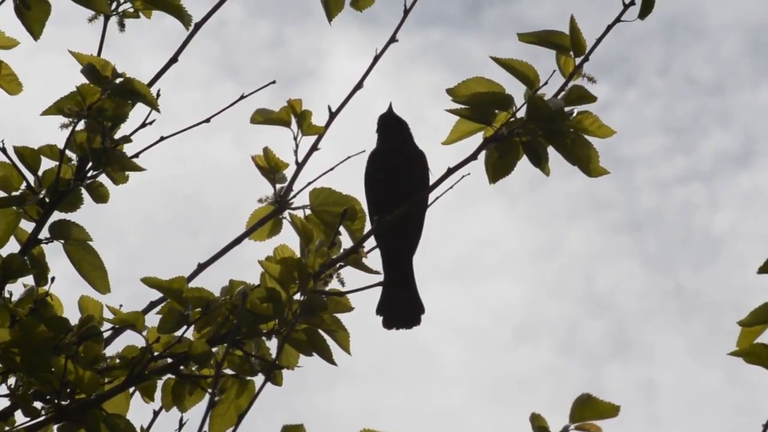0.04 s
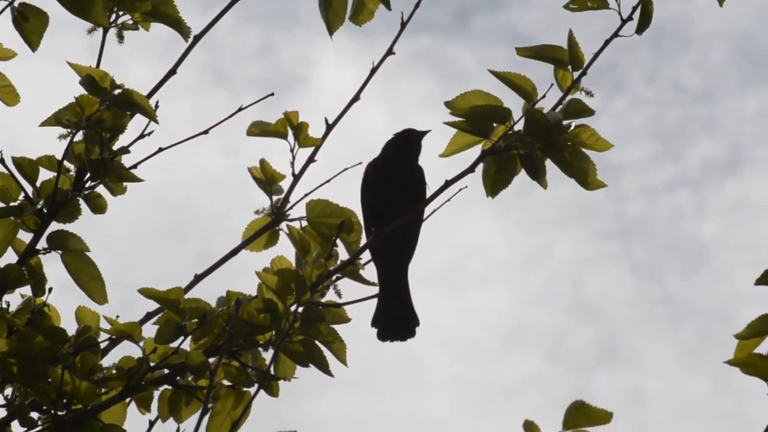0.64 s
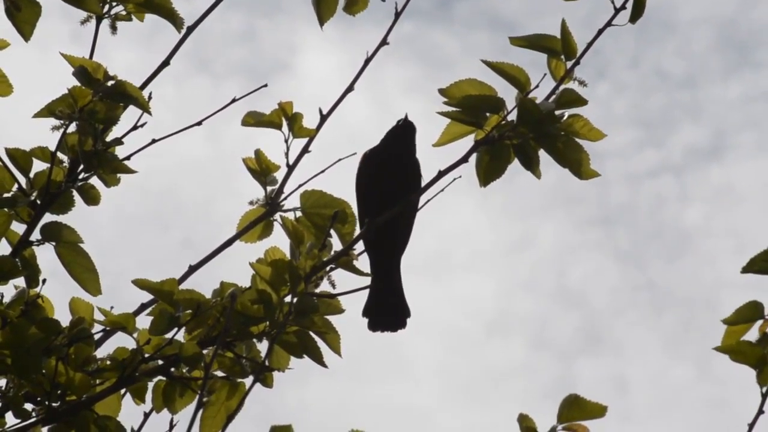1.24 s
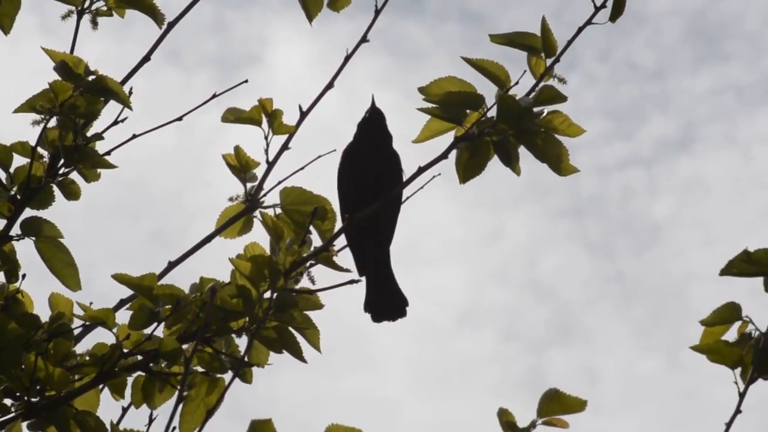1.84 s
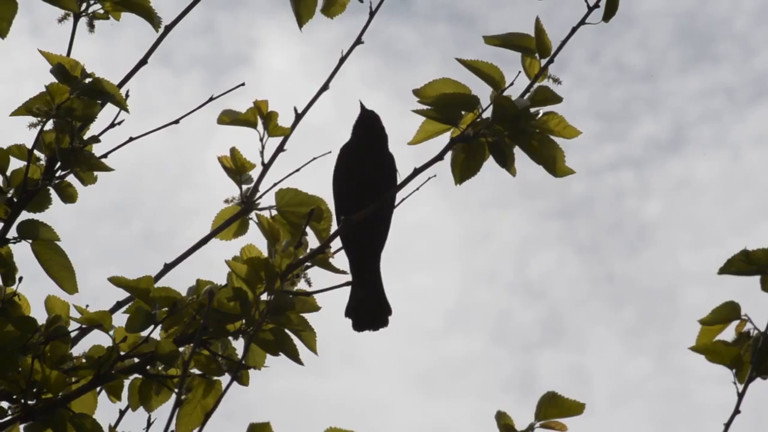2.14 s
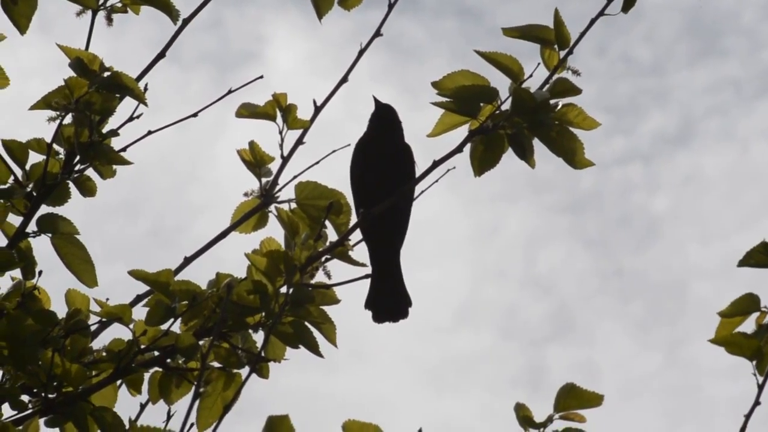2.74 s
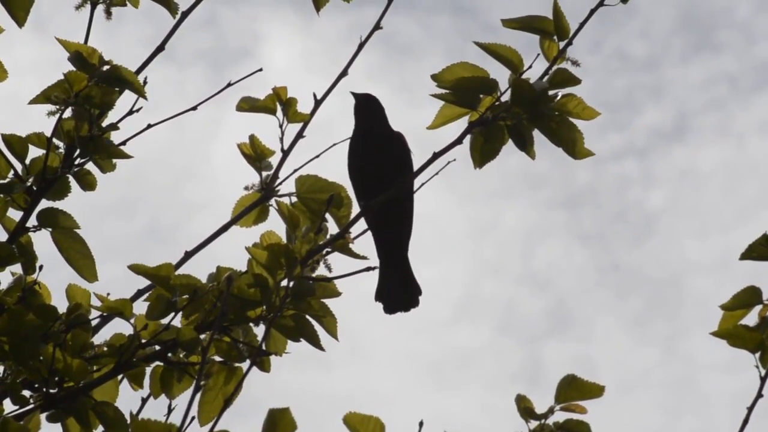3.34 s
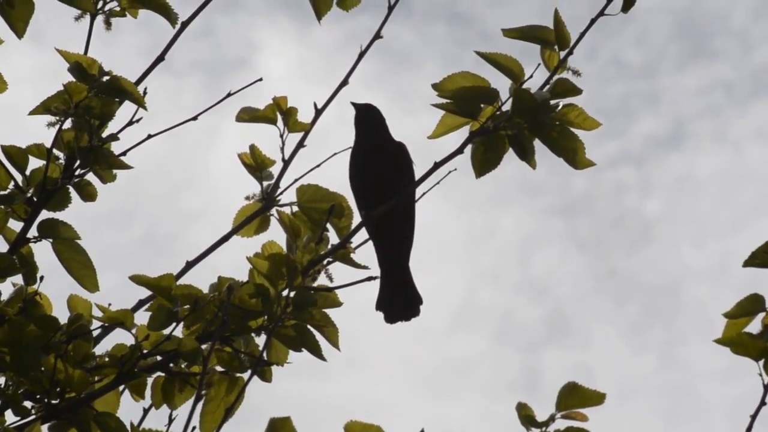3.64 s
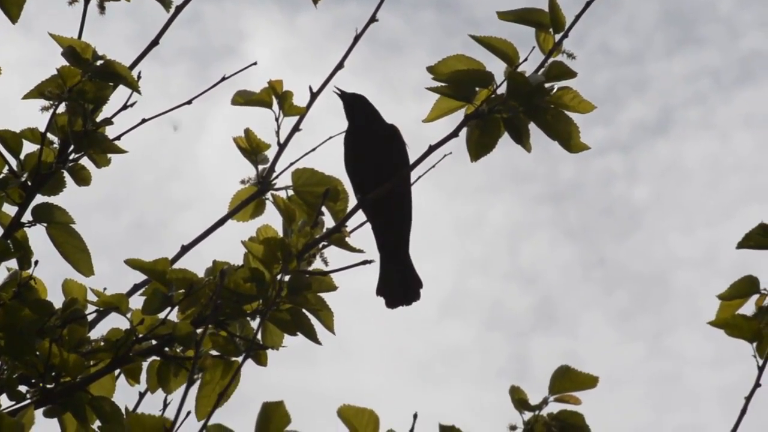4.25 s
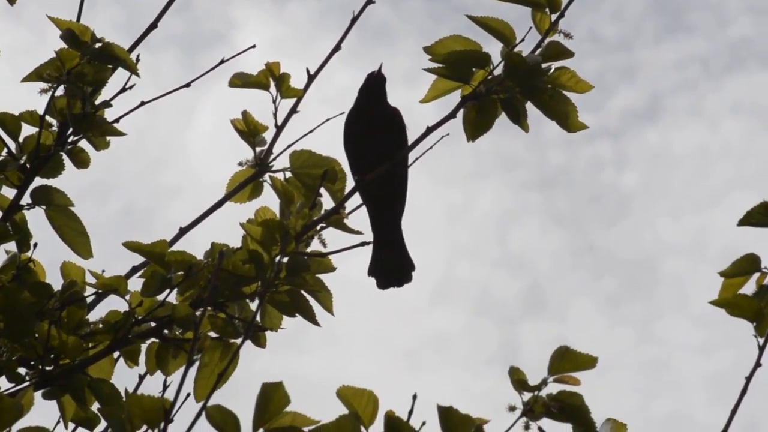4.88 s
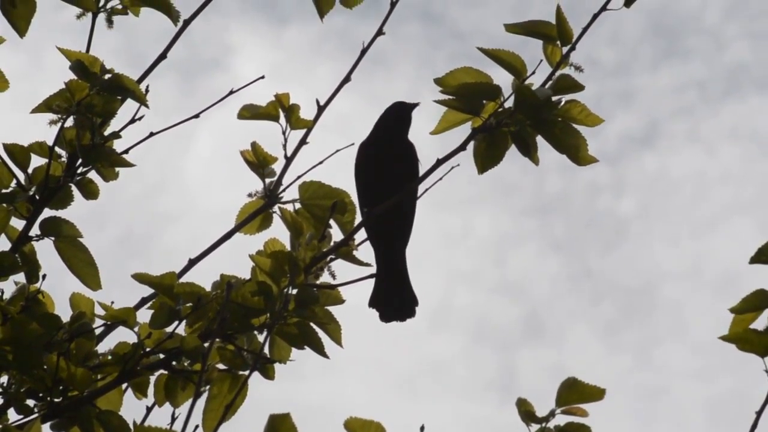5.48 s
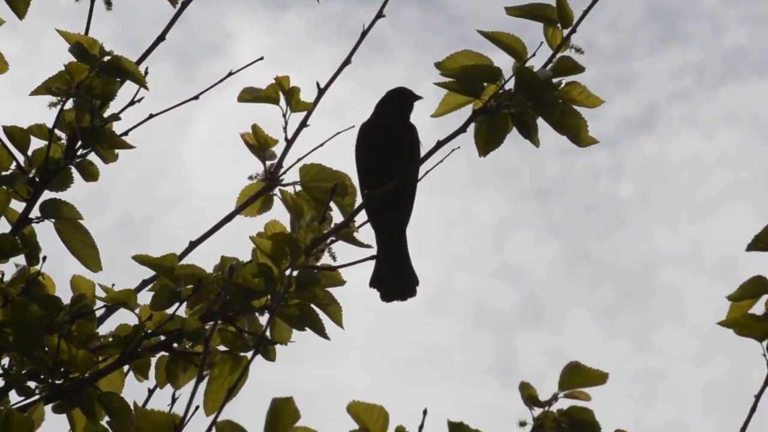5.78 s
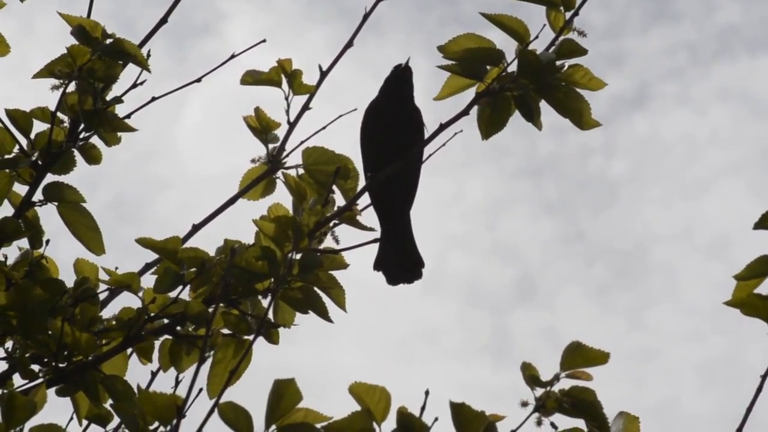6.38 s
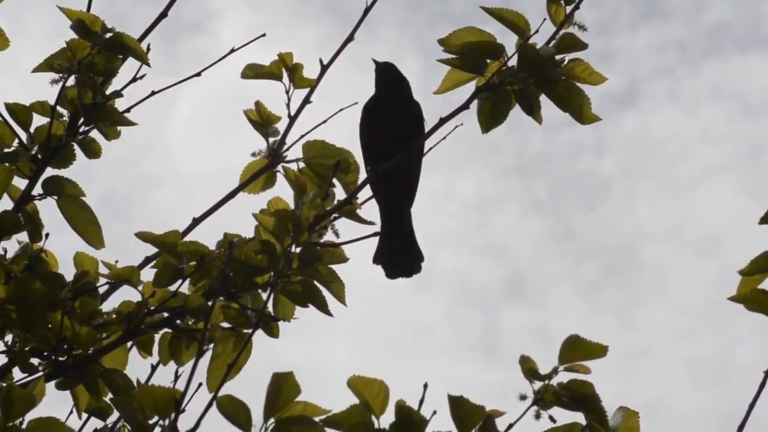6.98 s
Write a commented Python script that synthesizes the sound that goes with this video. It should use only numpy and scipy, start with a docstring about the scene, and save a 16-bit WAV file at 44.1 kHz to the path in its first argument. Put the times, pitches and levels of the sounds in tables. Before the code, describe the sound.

Three piercing, down-sliding bird whistles sound outdoors with long gaps and a few dry chacks, above a soft traffic rumble.

```python
"""A loud falling whistle from a blackbird on a branch opens the scene and comes twice more.
Each whistle breaks from the shrill side of its syrinx to the pure side, which slides down.
Far traffic rumbles and hums underneath, other birds chirp faintly and something rustles softly.
Two dry chacks and a lower chuck, puffs and pulses that ring the throat, come before the last whistle.
The recorder's gain control pulls the background down under each whistle."""
import sys
import numpy as np
from scipy import signal
from scipy.fft import rfft, irfft, next_fast_len
from scipy.io import wavfile
from scipy.ndimage import uniform_filter1d, minimum_filter1d

SR = 44100
rng = np.random.default_rng(int(sys.argv[2]) if len(sys.argv) > 2 else 0)


def int16_out(signal):
    """Quantize to a 16-bit WAV file."""
    q = np.round(np.clip(np.atleast_2d(signal).T, -1, 1) * 32767)
    wavfile.write(sys.argv[1], SR, q.astype(np.int16))


N = 313992
TIME = np.arange(N) / SR
PRE_ROLL = SR // 4  # samples before time zero, where the first whistle begins

# Levels are faders ahead of the gain control. A positive pan leans left.
# the blackbird's whistles: (time of the break [s], shrill lead [s], shrill top [Hz], shrill level [dB],
# slide length [s], glide [s], slide end [Hz], closing flick [Hz], slide level [dB], overtones [dB])
WHISTLE_CUES = [(-.072, .1, 3750, -7, .15, 0.068, 3710, -50, -2, 6.5),
                (2.102, .1105, 3785, -10.5, .19, 0.052, 3844, 40, 1, 1.5),
                (6.319, .095, 3860, -10, .17, 0.061, 3775, 167, -1.5, 0.5)]
# harmonics 1 to 4 of each side of the syrinx: (level [dB])
SHRILL_TIMBRE = [-16.5, 1.5, -22, -22]
SLIDE_TIMBRE = [0, -22, -24.5, -39]
# the beak radiates the middle of the range best: (frequency [Hz], gain [dB])
BEAK_EQ = [(2000, -2.5), (7800, 0.5), (9000, -3), (10400, -3), (11500, -13.5), (15000, -8)]
# the highest overtones lean right: (frequency [Hz], pan [dB])
WHISTLE_PAN = [(7500, 2), (10000, 0), (15000, -5)]
# the shrill side joins in again below the slide: (time [s], half length [s], level [dB])
UNDERTONE_CUES = [(.005, 0.029, -21), (2.257, .019, -27)]
# bright, rasping hiss on the loud, high start of the slide: (frequency [Hz], level [dB])
SLIDE_HISS_EQ = [(2000, -19), (3600, 1), (5000, 5), (6200, 0), (9500, 11), (11500, -3), (15000, -10)]
# hoarse hiss on the undertone: (frequency [Hz], level [dB])
UNDERTONE_HISS_EQ = [(2000, -16), (5000, -4), (9000, 12), (15000, -23)]
# decay of the yard's tail: (frequency [Hz], t60 [s])
YARD_DECAY = [(2000, 0.47), (4000, 0.68), (7500, 0.59), (14000, 0.36)]

# colour of the road and of the air: (frequency [Hz], level [dB])
ROAD_EQ = [(15, -26), (35, -33.5), (70, -18), (125, -10.5), (190, -4.5), (228, -2), (290, -9), (430, -7),
           (570, 0.5), (830, -1), (1030, 1), (1300, -5.5), (1650, -7), (2600, -51)]
AIR_EQ = [(880, -54), (1500, -9.5), (1840, -3), (2100, -5), (3360, -9), (4100, -13.5), (5240, -16),
          (5840, -18), (15000, -33.5), (15800, -48)]
# stereo image of both: (frequency [Hz], left-right likeness [-1 to 1])
BED_LIKENESS = [(60, 0.96), (130, 0.99), (290, 0.97), (640, 0.92), (1410, 0.57), (3100, -0.55),
                (6820, -0.047), (15000, 0.16)]
# fader rides of the road and of the engine's hum: (time [s], level [dB])
ROAD_FADER = [(0, -29.5), (.9, -30), (1.65, -28.5), (2.6, -30.5), (4.2, -30.5), (4.9, -28.5), (5.6, -29.5),
              (7.1, -29)]
HUM_FADER = [(0, -40), (2, -44), (2.6, -51.5), (3.1, -42.5), (3.7, -51.5), (7.1, -51)]
# far whines in the traffic: (start [s], end [s], pitch [Hz], level [dB])
WHINE_CUES = [(.4, 2.47, 573, -42.5), (3.3, 7.5, 501.7, -44.5)]

# one bird's repeated chip on the left, another's thin ticks on the right: (time [s], level [dB])
CHIP_CUES = [(.237, -37), (.578, -48), (1.265, -37), (3.903, -37.5), (4.377, -47), (4.801, -37),
             (5.584, -35.5)]
TICK_CUES = [(1.177, -37.5), (1.193, -40.5), (2.815, -39.5)]
# a third bird's rising twitter: (time [s], length [s], lower pitch [Hz], level [dB])
TWITTER_CUES = [(5.068, .042, 2890, -35), (5.096, 0.037, 2500, -35.5), (5.137, 0.088, 2645, -34.5)]
# hoarseness of all three: (frequency [Hz], level [dB])
CHIRP_HISS_EQ = [(2000, -6), (3200, 6.5), (4800, -6), (5700, -4), (6600, -4), (7400, -6), (12000, -42)]

# soft rustles: (time [s], width [s], level [dB])
RUSTLE_CUES = [(2.855, 0.036, -38.5), (2.97, 0.042, -43.5), (3.085, 0.025, -46), (3.293, 0.065, -33.5),
               (3.482, 0.037, -34.5), (3.989, 0.046, -34), (4.13, 0.032, -29.5), (6.935, 0.21, -48.5)]
# their colour: (frequency [Hz], level [dB])
RUSTLE_EQ = [(1060, -49), (1800, 3), (1950, -9.5), (3200, -0.5), (3470, -2.5), (3960, -2.5), (4570, 1),
             (5410, -8), (6570, -5), (10600, -13), (15000, -45)]

# dry chacks: (time of the peak [s], rise [s], fall [s], level [dB], pan [dB])
CHACK_CUES = [(3.989, 0.0094, 0.02, -10, 3.5), (4.254, 0.011, .014, -8, 2.5)]
# the throat's resonance in a chack: (frequency [Hz], level [dB])
THROAT_EQ = [(880, -50), (1500, -17.5), (1670, -27), (2350, -15), (2540, -11), (2780, -13.5), (3250, -6),
             (3690, 2.5), (3910, -1.5), (5240, -12), (5670, -20), (7900, -15), (10900, -30.5), (13700, -32),
             (15500, -45)]
# the chuck's two quick pulses: (time [s], level [dB])
CHUCK_PULSES = [(5.682, -11), (5.6897, -11)]
# the throat that rings with them: (frequency [Hz], level [dB], t60 [s])
THROAT_MODES = [(2830, -1.5, 0.035), (3130, -5, 0.019), (2420, -3.5, 0.019), (4460, -19, 0.017),
                (6640, -20, 0.038), (9300, -23, 0.02)]

# the shrill side: pitch, level and flutter
LEAP_SHARE, LEAP_S, BREAK_HZ = 0.52, 0.00246, 3198
REBOUND_HZ, REBOUND_S, OVERLAP_S = 452, 0.019, .06
SHRILL_SWELL_DB, SHRILL_DROP_DB, HANDOVER_S = 6, 9, 0.009
FLUTTER_CALM, FLUTTER_FORCED = 0.2, 0.71  # depth 0-1, deepest just before the break
# the pure side: pitch, brightness and level
SLIDE_TOP_HZ, SAG_HZ_PER_S, FLICK_S = 5715, 720, 0.0069
FORCED_FROM_HZ, FORCED_PURITY_DB = 5070, 13
SOFT_START_DB, SOFT_START_S, HOLD_S = 13, .017, .142
ACCENT_DB, ACCENT_AT_S, ACCENT_WIDTH_S = 7, 0.026, 0.012


def gain_of(db):
    """Decibels to amplitude."""
    return 10 ** (np.asarray(db) / 20)


def unit_rms(x):
    """Scales to rms 1."""
    return x / np.sqrt(np.mean(x ** 2) + 1e-20)


def ramp(x):
    """Holds a value between 0 and 1."""
    return np.clip(x, 0, 1)


def at_hz(points, hz):
    """Reads a curve on a log-frequency axis."""
    f, value = np.transpose(points)
    return np.interp(np.log(hz + 1), np.log(f + 1), value)


def ride(fader):
    """A fader's level in dB at every sample."""
    return np.interp(TIME, *np.transpose(fader))


def add(mix, s, sound):
    """Mixes a stereo sound in at time s."""
    part = mix[:, max(round(s * SR), 0):][:, :sound.shape[1]]
    part += sound[:, :part.shape[1]]


def panned(x, pan_db):
    """Sets a sound between left and right."""
    return x * gain_of(np.array([[1], [-1]]) * pan_db / 2)


def eased(x):
    """Fades a note in and out over a few milliseconds."""
    return x * signal.windows.tukey(x.shape[-1], .005 * SR / x.shape[-1])


def wander(size, rate_hz):
    """Smooth random modulation of rms 1, up to about the given rate."""
    length = next_fast_len(size + SR // 4)
    hz = np.fft.rfftfreq(length, 1 / SR)
    spectrum = rfft(rng.standard_normal(length)) * np.exp(-(hz / rate_hz) ** 2)
    return unit_rms(irfft(spectrum, length))[:size]


def phase_of(hz):
    """Running phase of a pitch curve."""
    return 2 * np.pi * np.cumsum(hz) / SR


def noise(colour, size, likeness):
    """Stereo noise of a given colour and left-right likeness."""
    hz = np.fft.rfftfreq(size, 1 / SR)
    mid, side = rfft(rng.standard_normal((2, size))) * gain_of(at_hz(colour, hz))
    same = at_hz(likeness, hz) if np.ndim(likeness) else likeness
    mid, side = mid * np.sqrt(1 + same), side * np.sqrt(1 - same)
    return unit_rms(irfft(np.array([mid + side, mid - side]), size))


def tone(hz, harmonics_db, jitter, rasp=0):
    """A slightly unsteady tone; rasp frays its overtones."""
    phase = phase_of(hz * (1 + jitter * wander(len(hz), 430)))
    out = np.zeros(len(hz))
    for k, db in enumerate(harmonics_db, 1):
        fray = 1 + rasp * (k - 1) * wander(len(hz), 470) if rasp else 1
        out += gain_of(db) * fray * np.sin(k * phase)
    return np.sqrt(2) * out


def whistles(left_lag_s=.00001):
    """Both sides of the syrinx sound through the beak, reaching the right microphone first."""
    syrinx = np.zeros((2, PRE_ROLL + N))
    for s, lead, top_hz, shrill_db, *slide_shape in WHISTLE_CUES:
        add(syrinx, PRE_ROLL / SR + s - lead, shrill(lead, top_hz, shrill_db))
        add(syrinx, PRE_ROLL / SR + s, slide(s, *slide_shape))
    size = next_fast_len(PRE_ROLL + N)
    hz = np.fft.rfftfreq(size, 1 / SR)
    spectrum = rfft(syrinx, size) * gain_of(at_hz(BEAK_EQ, hz))
    spectrum[0] *= np.exp(-2j * np.pi * hz * left_lag_s)
    return irfft(panned(spectrum, at_hz(WHISTLE_PAN, hz)), size)[:, :PRE_ROLL + N]


def shrill(lead, top_hz, level_db, flutter_hz=290, flutter_bend=0.0035):
    """The shrill side leaps up, sinks to the break as it swells and flutters, then rebounds softly."""
    t = np.arange(0, lead + OVERLAP_S, 1 / SR)
    effort = ramp(t / lead)
    handed_over = ramp((t - lead) / HANDOVER_S + 1)
    after_break = np.maximum(t - lead, 0) / REBOUND_S
    leap = 1 - LEAP_SHARE * np.exp(-t / LEAP_S)
    rebound_hz = REBOUND_HZ * (after_break * np.exp(1 - after_break)) ** 2
    hz = (top_hz + (BREAK_HZ - top_hz) * effort) * leap + rebound_hz
    db = level_db - SHRILL_SWELL_DB * (1 - effort) ** 2 - SHRILL_DROP_DB * handed_over
    depth = FLUTTER_CALM + (FLUTTER_FORCED - FLUTTER_CALM) * effort * (1 - handed_over)
    flutter = np.sin(phase_of(flutter_hz * (1 + 0.324 * wander(len(t), 44))))
    # the octave leads; the fundamental speaks just after the leap and comes forward when blown softly
    late_db = -25 * np.exp(-(t / 0.0028) ** 2)
    fundamental_db = SHRILL_TIMBRE[0] + late_db - 0.97 * (db + 11.5)
    voice = tone(hz * (1 + flutter_bend * flutter), [fundamental_db, *SHRILL_TIMBRE[1:]],
                 jitter=.01, rasp=.16)
    return panned(gain_of(db) * eased(voice * (1 + depth * flutter)), pan_db=1)


def slide(s, length, glide, end_hz, flick_hz, level_db, bright_db):
    """The pure side glides down and levels off; it swells to an accent, holds and fades."""
    t = np.arange(0, length, 1 / SR)
    descent = (t / glide) ** 2
    hz = end_hz + (SLIDE_TOP_HZ - end_hz) * np.exp(-descent) + SAG_HZ_PER_S * (HOLD_S - t)
    hz += flick_hz * ramp((t - HOLD_S) / FLICK_S)
    accent_db = ACCENT_DB * np.exp(-((t - ACCENT_AT_S) / ACCENT_WIDTH_S) ** 2)
    db = level_db - SOFT_START_DB * np.exp(-t / SOFT_START_S) + accent_db
    release = ramp((length - t) / (length - HOLD_S)) ** 1.64
    # on the high, forced part the overtones give way to hiss
    forced = ramp((hz - FORCED_FROM_HZ) / (SLIDE_TOP_HZ - FORCED_FROM_HZ))
    overtones_db = [level + bright_db - FORCED_PURITY_DB * forced for level in SLIDE_TIMBRE[1:]]
    voice = tone(hz, [SLIDE_TIMBRE[0], *overtones_db], jitter=0.0029, rasp=0.16)
    grit = gain_of(-33) * wander(len(t), 1900)
    flutter = 0.16 * (descent * np.exp(1 - descent)) ** 2 * wander(len(t), 400)  # deepest in mid-fall
    hiss = gain_of(-37) * (hz / 4500) ** 3 * noise(SLIDE_HISS_EQ, len(t), likeness=0.81)
    voice = gain_of(db) * release * (voice * (1 + grit + flutter) + hiss) + undertone(s + t, hz)
    return panned(eased(voice), pan_db=2 * ramp((5600 - hz) / 1500))  # the low end leans left


def undertone(t, slide_hz, ratio=3 / 4):
    """A soft, hoarse voice locked below the slide; coupled to it, it also sounds their summed pitch."""
    envelope = sum(gain_of(db) * np.exp(-((t - s) / half) ** 4) for s, half, db in UNDERTONE_CUES)
    hz = ratio * slide_hz
    hiss = gain_of(-3) * noise(UNDERTONE_HISS_EQ, len(t), likeness=0.65)
    voice = tone(hz, [0, -6, -9], jitter=0.024)
    sum_tone = tone(hz + slide_hz, [0], jitter=0.0018)
    return envelope * (voice + sum_tone + hiss)


def yard(x, echo_s=0.012, echo_db=-17, leaves_db=-19, leaves_t60=0.43, tail_db=-25):
    """Adds one near reflection, a quick scatter from the branches and a faint tail."""
    t = np.arange(SR) / SR
    signs = rng.choice([-1., 1.], (2, 2, SR))
    leaf_taps, tail_taps = signs * (rng.random((2, 2, SR)) < 3000 / SR)  # about 3000 echoes a second
    leaves = leaf_taps * gain_of(-60 * t / leaves_t60) * (t > .003)
    hz, age, bands = signal.stft(tail_taps * (t > .02), SR, nperseg=256)
    decay = gain_of(-60 * age / at_hz(YARD_DECAY, hz)[:, None])
    tail = signal.istft(bands * decay, SR, nperseg=256)[1][:, :SR]
    response = (gain_of(leaves_db) * unit_rms(leaves) + gain_of(tail_db) * unit_rms(tail)) / np.sqrt(SR)
    response[:, round(echo_s * SR)] += gain_of(echo_db)
    return x + signal.fftconvolve(x, response, axes=1)[:, :x.shape[1]]


def road(bass_db=1.5, thins_at_s=3.47, thins_db_per_s=1.9):
    """Far road noise swells gently; its rumble thins as the engine moves off."""
    wash = noise(ROAD_EQ, N, BED_LIKENESS) * gain_of(ride(ROAD_FADER) + 0.1 * wander(N, 24))
    bass = signal.sosfiltfilt(signal.butter(2, [115, 330], "bandpass", fs=SR, output="sos"), wash)
    bass_gain = gain_of(bass_db - thins_db_per_s * np.maximum(TIME - thins_at_s, 0))
    return wash + bass * (bass_gain - 1)


def air(level_db=-37):
    """A thin, steady hiss of open air."""
    return panned(noise(AIR_EQ, N, BED_LIKENESS) * gain_of(level_db), pan_db=-0.5)


def engine(hum_hz=159.3, sag_hz_per_s=2.2):
    """A far engine slows steadily, humming an octave above its faint firing tone."""
    firing_hz = (hum_hz - sag_hz_per_s * TIME) / 2
    return tone(firing_hz, [-15, 0], jitter=0.021) * gain_of(ride(HUM_FADER) + 2.6 * wander(N, 3))


def whines(fade_s=0.28):
    """Faint, wavering tones fade in and out of the traffic."""
    out = np.zeros(N)
    for start, end, hz, db in WHINE_CUES:
        fade = ramp(np.minimum(TIME - start, end - TIME) / fade_s)
        out += fade * tone(np.full(N, hz), [db], jitter=0.02)
    return out * gain_of(1.5 * wander(N, 8.7))


def far_birds(chip_s=.046, tick_s=.02):
    """Three farther birds, each with its own voice and perch, heard with more of the yard's reverb."""
    out = np.zeros((2, N))
    for s, db in CHIP_CUES:
        chip = chirp(chip_s, lower_hz=3720, interval=1.135, rise=-0.016, arch=0.144, hoarse_db=-7)
        add(out, s - chip_s / 2, panned(gain_of(db) * chip, pan_db=17))
    for s, db in TICK_CUES:
        tick = chirp(tick_s, lower_hz=4450, interval=1.1, rise=-.01, arch=0.089, hoarse_db=-8)
        add(out, s - tick_s / 2, panned(gain_of(db) * tick, pan_db=-17))
    for s, length, hz, db in TWITTER_CUES:
        twitter = chirp(length, hz, interval=1.42, rise=0.101, arch=0.073, hoarse_db=-5.5)
        add(out, s - length / 2, panned(gain_of(db) * twitter, pan_db=-5))
    return yard(out, echo_db=-31, leaves_db=-7.5, leaves_t60=.35, tail_db=-18.5)


def chirp(length, lower_hz, interval, rise, arch, hoarse_db):
    """Two hoarse tones at once; the upper one arches, and a faint extra tone rings with them."""
    position = np.linspace(-1, 1, round(length * SR))
    hz = lower_hz * (1 + rise * position / 2)
    lower = tone(hz, [0, -17], jitter=.01)
    upper = gain_of(-2) * tone(hz * interval * (1 - arch * position ** 2), [0, -19], jitter=.016)
    hiss = gain_of(hoarse_db) * noise(CHIRP_HISS_EQ, len(hz), likeness=0.42)
    ring = tone(1.4 * hz, [-13], jitter=0.013)
    return (unit_rms(lower + upper + ring) + hiss) * np.cos(np.pi * position / 2)


def rustles(grain_db=2, grain_hz=250):
    """Brief swishes with a fine grain, a little to the left."""
    strokes = sum(gain_of(db) * np.exp(-0.75 * ((TIME - s) / width) ** 2) for s, width, db in RUSTLE_CUES)
    swishes = strokes * noise(RUSTLE_EQ, N, likeness=.8)
    return panned(swishes * gain_of(grain_db * wander(N, grain_hz)), pan_db=4.5)


def chacks():
    """Short, dry puffs through the throat's resonance."""
    out = np.zeros((2, N))
    t = np.arange(-SR // 10, SR // 10) / SR
    for s, rise, fall, db, pan_db in CHACK_CUES:
        puff = np.exp(-abs(t / np.where(t < 0, rise, fall)) ** 1.47)
        rasp = noise(THROAT_EQ, len(t), likeness=0.63)
        add(out, s + t[0], panned(gain_of(db) * puff * rasp, pan_db))
    return out


def chuck(rise_s=0.0012):
    """A lower call from the right: each pulse rings the throat briefly and unsteadily."""
    out = np.zeros((2, N))
    t = np.arange(SR // 20) / SR
    attack = 1 - np.exp(-t / rise_s)
    for s, db in CHUCK_PULSES:
        ring = sum(tone(np.full(len(t), hz), [mode_db], jitter=0.065) * gain_of(-60 * t / t60)
                   for hz, mode_db, t60 in THROAT_MODES)
        add(out, s, panned(gain_of(db) * ring * attack, pan_db=-5))
    return out


def gain_control(x, threshold_db=-8, attack_s=0.017, hold_s=0.091, recovery_db_per_s=65,
                 start_duck_db=12, start_hold_s=0.076):
    """Ducks the whole mix quickly under a loud call, holds, then recovers."""
    power = uniform_filter1d((x ** 2).mean(0), size=128)
    over_db = np.maximum(10 * np.log10(abs(power) + 1e-12) - threshold_db, 0)
    half = round(hold_s * SR / 2)
    held_db = -minimum_filter1d(-over_db, 2 * half + 1, origin=half, mode="nearest")
    held_db[TIME < start_hold_s] = start_duck_db  # the first whistle is already under way
    recovery_db = TIME * recovery_db_per_s
    duck_db = np.maximum.accumulate(held_db + recovery_db) - recovery_db
    pole = np.exp(-1 / (attack_s * SR))
    duck_db = signal.lfilter([1 - pole], [1, -pole], duck_db - start_duck_db) + start_duck_db
    return x * gain_of(-duck_db)


def limiter(x, ceiling=.98):
    """Turns down any peak that would pass the ceiling."""
    gain = 1 / np.maximum(abs(x).max(0) / ceiling, 1)
    return x * uniform_filter1d(minimum_filter1d(gain, size=129), size=129)


def scene():
    """Near calls in the yard, with far birds and rustles over a bed of traffic and air."""
    calls = whistles()
    add(calls, PRE_ROLL / SR, chacks() + chuck())
    return yard(calls)[:, PRE_ROLL:] + far_birds() + rustles() + road() + air() + engine() + whines()


def record(dry, cutoff_hz=15900):
    """The recorder's chain: gain control, peak limiter and a steep low-pass."""
    low_pass = signal.firwin(511, cutoff_hz, window=("kaiser", 9), fs=SR)
    return signal.oaconvolve(limiter(gain_control(dry)), low_pass[None], "same")


dry = scene()
out = record(dry)
int16_out(out)
```